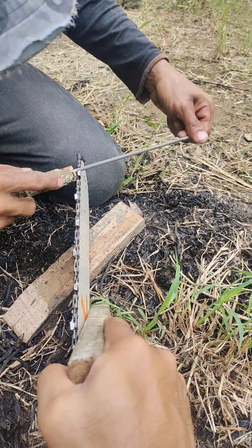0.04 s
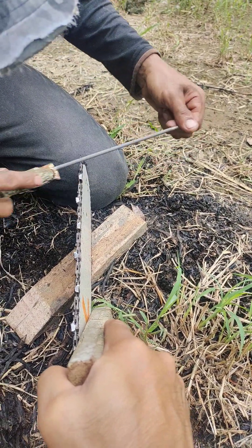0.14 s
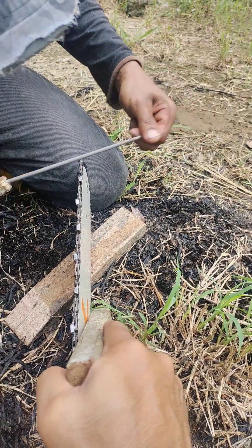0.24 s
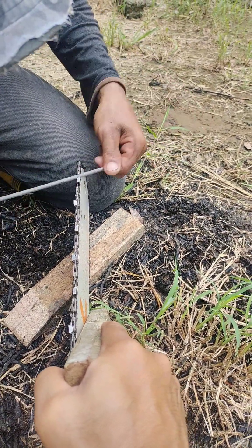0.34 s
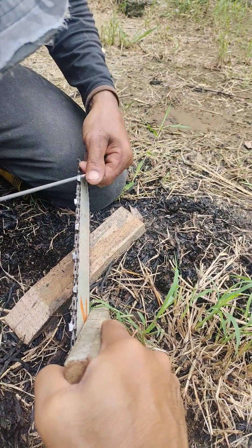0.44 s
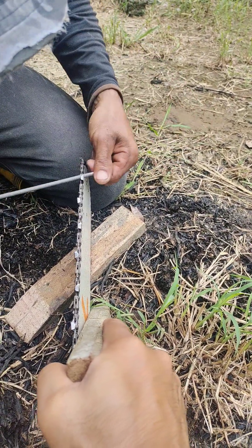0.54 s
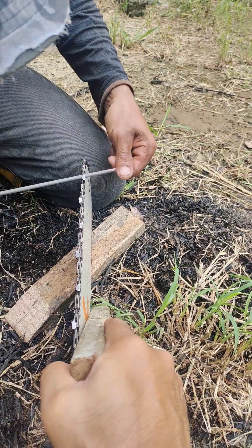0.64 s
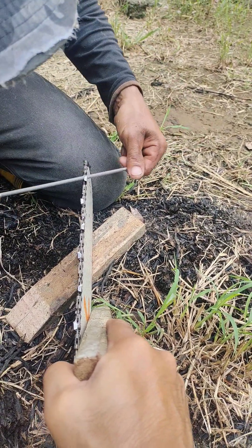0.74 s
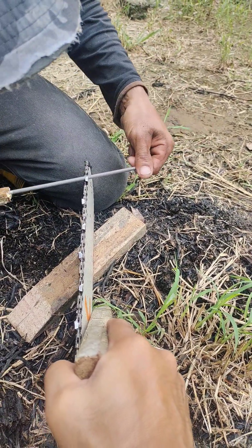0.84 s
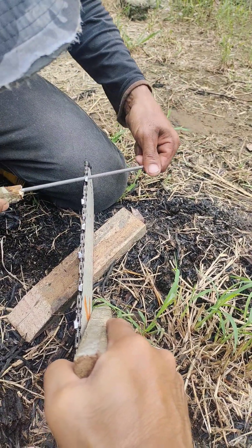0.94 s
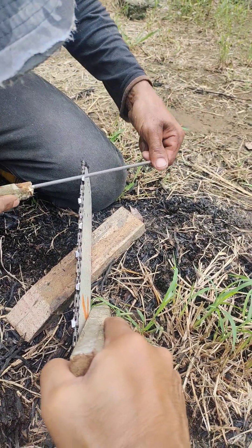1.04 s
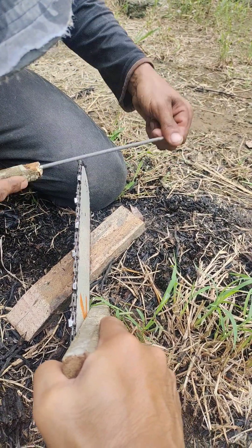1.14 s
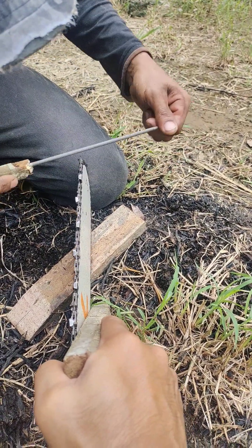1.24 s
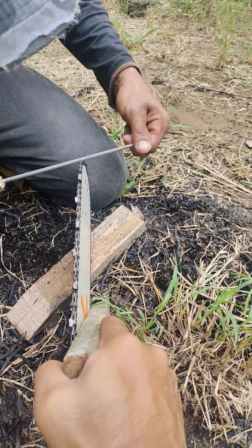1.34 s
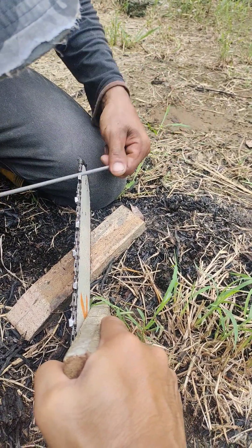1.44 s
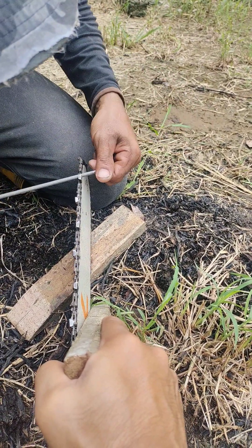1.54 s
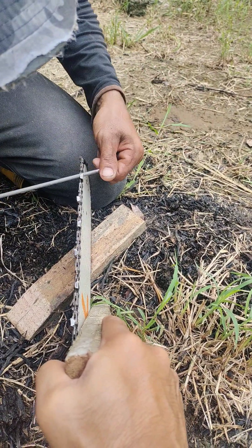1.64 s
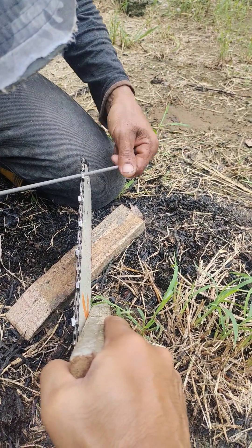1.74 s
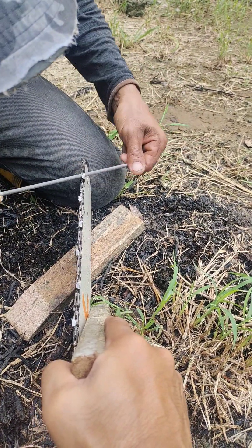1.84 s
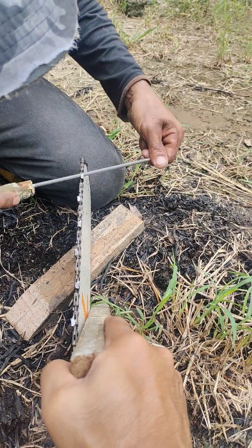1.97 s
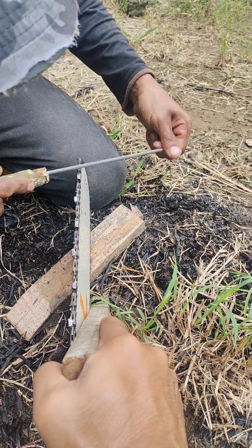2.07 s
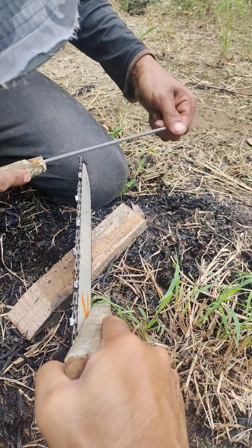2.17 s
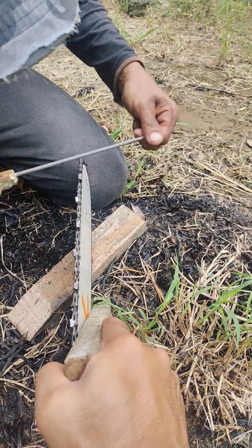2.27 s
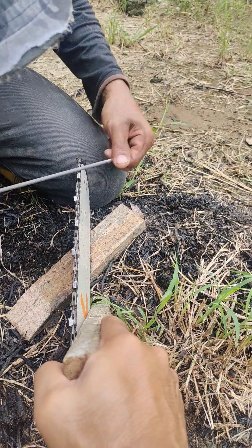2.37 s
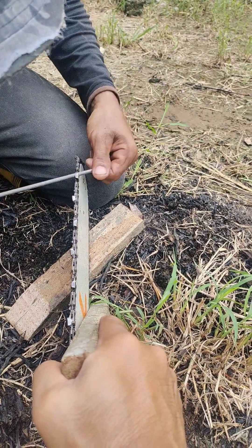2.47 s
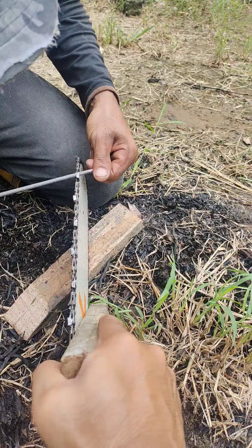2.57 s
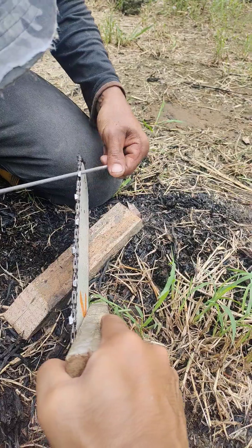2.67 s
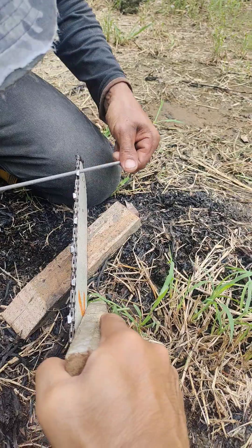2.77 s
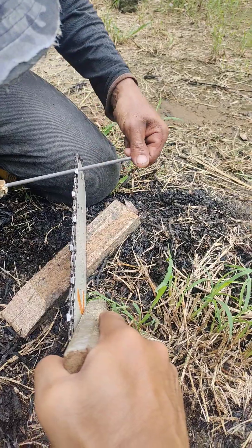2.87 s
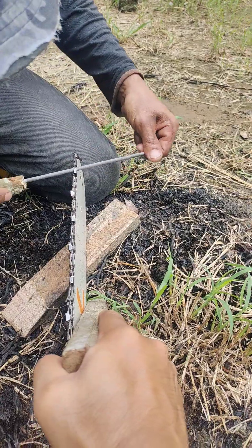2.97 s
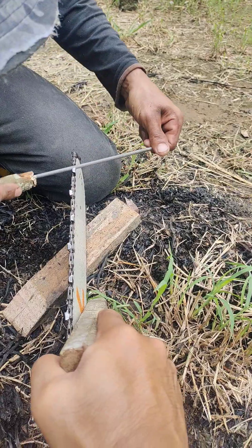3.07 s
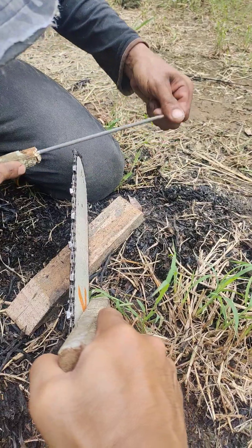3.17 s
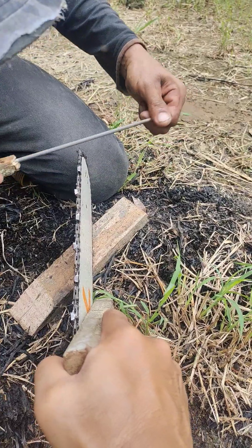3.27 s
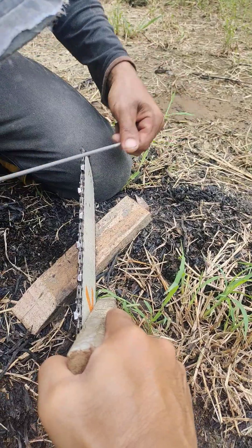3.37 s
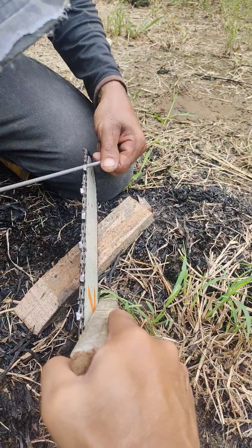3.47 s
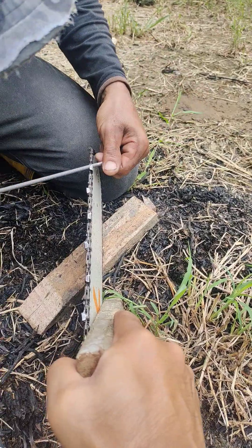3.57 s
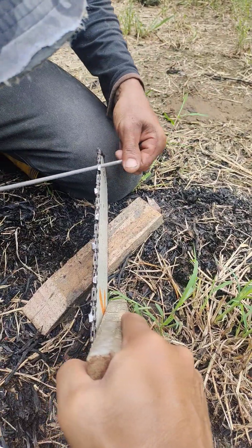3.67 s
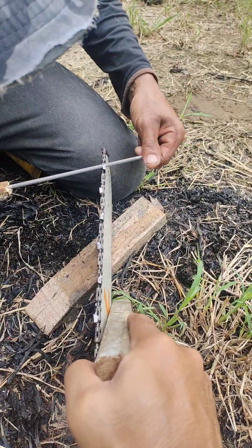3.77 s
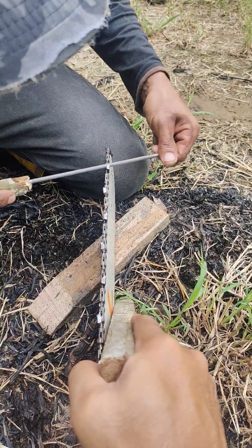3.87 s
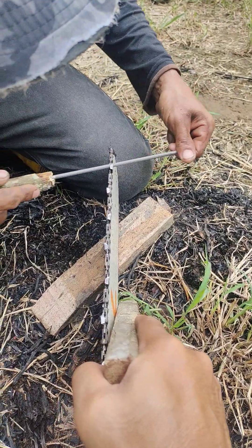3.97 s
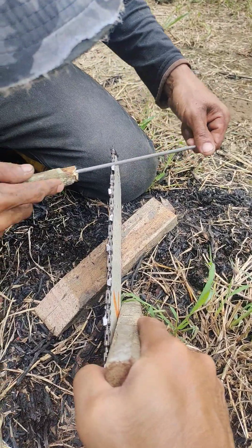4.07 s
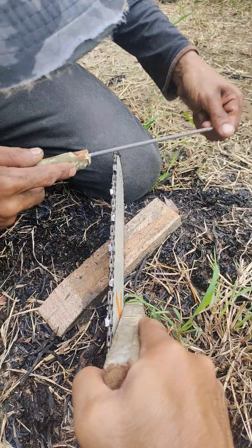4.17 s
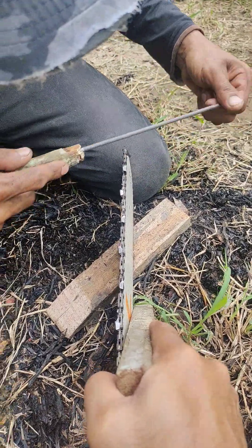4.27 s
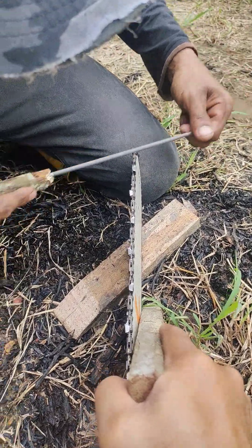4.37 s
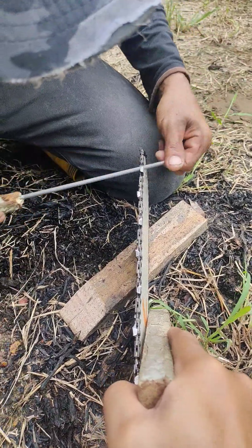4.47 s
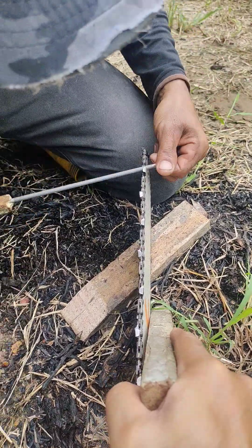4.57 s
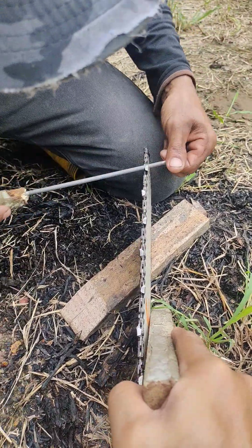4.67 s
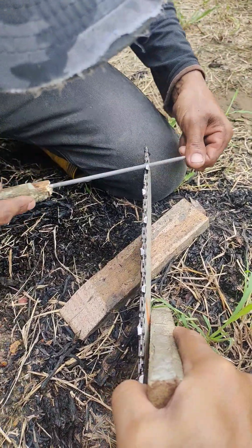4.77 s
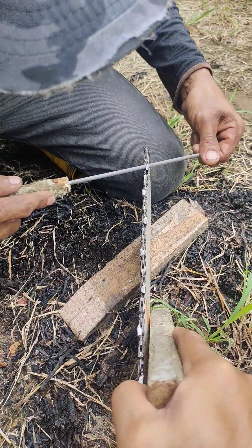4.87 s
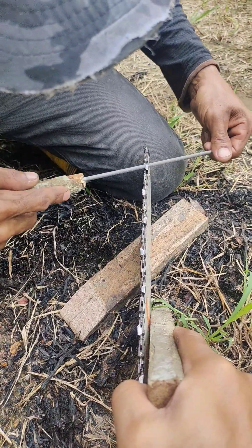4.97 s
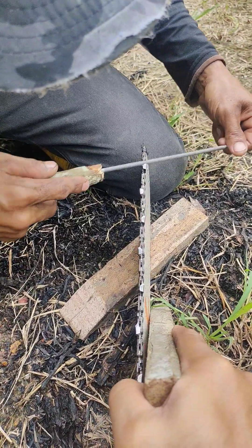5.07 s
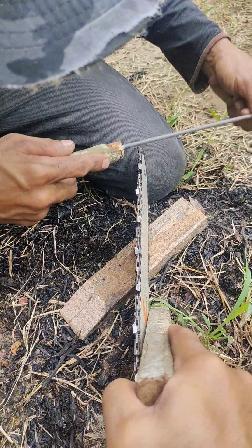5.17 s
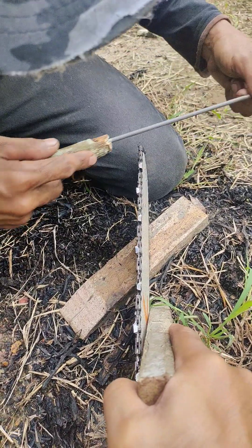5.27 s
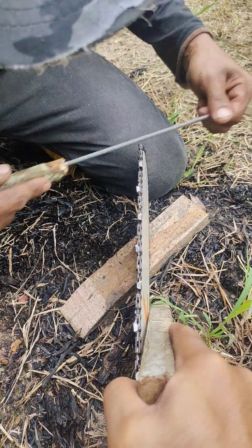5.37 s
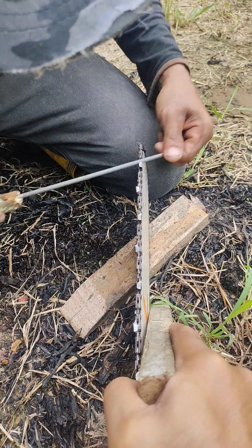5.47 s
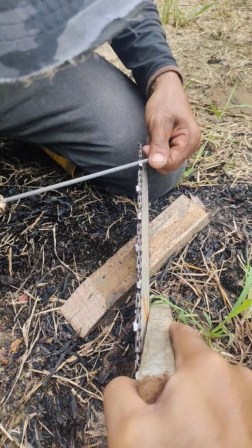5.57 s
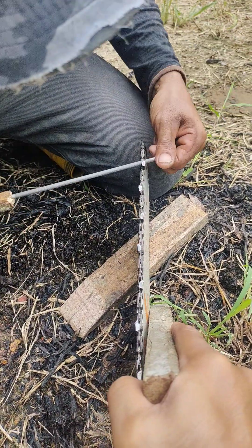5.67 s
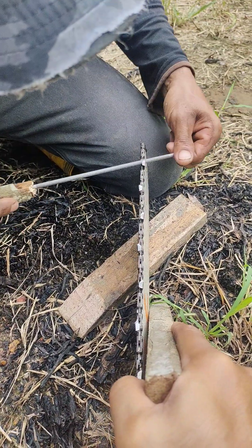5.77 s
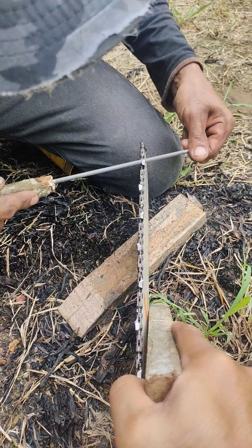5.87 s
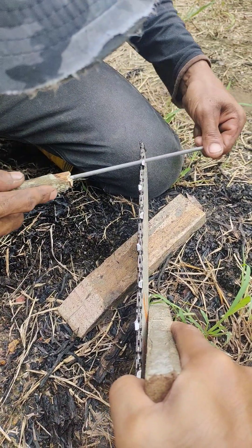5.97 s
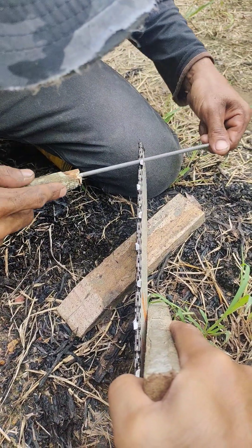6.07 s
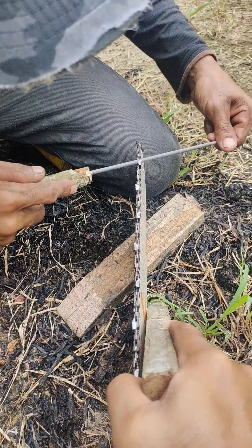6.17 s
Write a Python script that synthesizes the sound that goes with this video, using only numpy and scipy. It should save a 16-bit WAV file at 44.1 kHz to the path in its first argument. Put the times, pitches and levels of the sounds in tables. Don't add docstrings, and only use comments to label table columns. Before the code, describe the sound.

Close, bright metallic filing on a saw chain, a short drag back then a longer grating push, about one stroke a second in open air.

```python
import sys
import numpy as np
from scipy import signal
from scipy.fft import rfft, irfft, next_fast_len
from scipy.io import wavfile
from scipy.ndimage import uniform_filter1d, map_coordinates

SR = 44100
rng = np.random.default_rng(int(sys.argv[2]) if len(sys.argv) > 2 else 0)


def wav_out(sig):
    wavfile.write(sys.argv[1], SR, np.round(np.clip(np.atleast_2d(sig).T, -1, 1) * 32767).astype(np.int16))


def how_loud(loudness_db):
    steps = np.asarray(loudness_db, float) / 20
    return 10 ** steps


N = 274302
USUAL_PRESSURE_DB, USUAL_BITE_DB = -45, -56


def filing():
    t = np.arange(N) / SR
    back, forth = drags(t), pushes(t)
    gains = np.hypot(back, forth)
    dragging = back[1] > forth[1]
    chatter = how_loud(1.52 * wobble(30))
    parts = [
        (bar_flex(), 1.1),
        (link_rattle(chatter, dragging), 3),
        (cutter_scrape(chatter, dragging), 2.5),
        (fine_cutting(chatter, dragging), 3),
    ]
    steel = sum(gain * how_loud(db) * unit(part) for gain, (part, db) in zip(gains, parts))

    def cancelled(hz):
        left = gap(hz, 288, 36, depth=0.4) * gap(hz, 557, 45, depth=0.53) * gap(hz, 1106, 34, depth=0.52)
        right = gap(hz, 250, 43, depth=0.38) * gap(hz, 5050, 250, depth=0.5)
        return np.array([left, right])
    return filtered(steel, cancelled)


# (time [s], pressure [dB], bite [dB])
STROKES = [
    [(0.55, -45.5, -57.5), (0.604, -43, -48.5), (0.688, -45, -55.5), (0.72, -48, -59), (1.01, -43.5, -56.5),
     (1.062, -43.5, -65)],
    [(1.655, -42.5, -62.5), (1.703, -48, -49.5), (1.765, -40.5, -56), (1.791, -42, -54), (1.977, -41, -52),
     (2.04, -47.5, -60)],
    [(2.6, -51, -62.5), (2.626, -48, -57), (2.792, -38.5, -52.5), (2.912, -48.5, -54), (2.976, -35.5, -53),
     (3.052, -49, -62.5)],
    [(3.61, -50.5, -67.5), (3.658, -41.5, -51.5), (3.78, -49, -54), (3.88, -39, -55.5), (4.062, -46, -55),
     (4.07, -45, -55)],
    [(4.63, -54.5, -62.5), (4.692, -47.5, -54), (4.86, -41, -53.5), (4.878, -46.5, -54),
     (5.022, -45.5, -54.5), (5.072, -41.5, -58)],
    [(5.665, -40, -59.5), (5.723, -41, -52), (5.801, -47.5, -55), (5.933, -45, -55.5), (6.187, -45, -61.5),
     (6.21, -55, -58.5)],
]
# (time [s], pressure [dB], bite [dB])
EARLIER_STROKE = [(0.0, -42, -53.5), (0.03, -47.5, -61.5)]
# (time [s], force [dB])
LIFTS = [
    (0.032, -57),
    (1.078, -39.5),
    (2.057, -43),
    (3.068, -39.5),
    (4.092, -43.5),
    (5.089, -36),
    (6.24, -37),
]
# (usual level [dB], slope on pressure [dB/dB], slope on bite [dB/dB])
FOLLOW = [(-45, 1.1, 0.01), (-47.5, 0.12, 0.55), (-57, -0.23, 0.97), (-54.5, -0.05, 1.14)]
# (flex, rattle, scrape, fine [dB/s])
RISE_DB_PER_S = (603, 550, 450, 400)
FALL_DB_PER_S = (900, 1100, 1180, 1500)


def pushes(t):
    reach_s = 0.125
    lift_db, lift_rise_db_per_s = np.array([[-5], [0.7], [-2.5], [-12]]), 902
    power = np.zeros((4, N))
    rise, fall = np.array(RISE_DB_PER_S)[:, None], np.array(FALL_DB_PER_S)[:, None]
    usual_db, per_pressure, per_bite = np.transpose(FOLLOW)[:, :, None]
    for rows, (clear, _) in zip(EARLIER_STROKE_FIRST(), LIFTS):
        s, pressure_db, bite_db = np.transpose(rows)
        on = (t > s[0] - reach_s) & (t < clear + reach_s)
        u = t[on]
        db = usual_db + per_pressure * (np.interp(u, s, pressure_db) - USUAL_PRESSURE_DB)
        db = db + per_bite * (np.interp(u, s, bite_db) - USUAL_BITE_DB)
        db = db - rise * np.maximum(s[0] - u, 0) - fall * np.maximum(u - clear, 0)
        power[:, on] += how_loud(db) ** 2
    for clear, force_db in LIFTS:
        on = np.abs(t - clear) < reach_s
        u = t[on] - clear
        db = force_db + lift_db + lift_rise_db_per_s * np.minimum(u, 0) - fall * np.maximum(u, 0)
        power[:, on] += how_loud(db) ** 2
    return np.sqrt(power)


def EARLIER_STROKE_FIRST():
    return [EARLIER_STROKE] + list(STROKES)


# (landing [s], halt [s], weight [dB], top speed [dB], lean on the bar at the halt [dB])
DRAGS = [
    (0.363, 0.466, -39.5, -43, -50),
    (1.458, 1.562, -42.5, -47, -46),
    (2.416, 2.508, -43, -43.5, -45),
    (3.438, 3.525, -39, -45, -39.5),
    (4.468, 4.554, -40, -41.5, -48),
    (5.476, 5.57, -41, -40, -48),
]
# (landing [dB], top speed [dB], quiet over lean [dB], rest over lean [dB])
DRAG_FLEX_DB = (-41.5, -49, -6.5, -49)
# (landing, top speed, halt, quiet, rest [dB])
DRAG_RATTLE_DB = (-4.5, 0.5, -3, -20, -36)
DRAG_SCRAPE_DB = (-1.5, 0, -20, -37, -38)
DRAG_FINE_DB = (-9, -7, -23, -58, -40)


def drags(t):
    peak_s, stop_s = 0.035, 0.02
    gains = np.zeros((4, N))
    land_db, slide_db, quiet_db, rest_db = DRAG_FLEX_DB
    for lands, halts, weight_db, speed_db, lean_db in DRAGS:
        s = [lands, lands + peak_s, halts, halts + stop_s, halts + 2 * stop_s]
        lean_rattle_db = 0.33 * (lean_db - USUAL_PRESSURE_DB) * np.greater_equal(s, halts)
        shapes = [
            (land_db, slide_db, lean_db, lean_db + quiet_db, lean_db + rest_db),
            weight_db + np.array(DRAG_RATTLE_DB) + lean_rattle_db,
            speed_db + np.array(DRAG_SCRAPE_DB),
            speed_db + np.array(DRAG_FINE_DB),
        ]
        on = (t >= s[0]) & (t < s[-1])
        gains[:, on] = [how_loud(np.interp(t[on], s, db)) for db in shapes]
    return gains


# (frequency [Hz], width [Hz], level [dB], right ear [dB])
FLEX = [(347.3, 33.4, 3.5, -7), (393.7, 34.2, -0.5, -2.5), (428, 62, -16.5, 2)]


def bar_flex():
    return steadied(radiated(teeth(4000, 0.5, 0.93), FLEX, lag_s=0.00031), firm=0.25)


# (frequency [Hz], width [Hz], level [dB], right ear [dB])
RATTLE = [(725.5, 129, 1, -7.5), (864, 133, 1, -21), (1015, 67, -1.5, -10), (1245, 290, -10.5, -9.5),
          (1454, 170, -9.5, -3.5)]
# (frequency [Hz], width [Hz], level [dB], right ear [dB])
SING = [(1629.5, 51, 1.5, -10.5), (2637, 40, -9.5, -9)]


def link_rattle(chatter, dragging):
    force = sliding(chatter * teeth(6000, 2.4, 0.56), patchy_db=1.05, turns=0.74)
    rattle = radiated(force, RATTLE, lag_s=0.0004)
    rattle = filtered(rattle, lambda hz: (1j * hz / (520 + 1j * hz)) ** 4)
    light = filtered(rattle, lambda hz: gap(hz, 810, 200, depth=0.21))
    rattle = np.where(dragging, unit(light), unit(rattle))
    song = radiated(chatter * teeth(6000, 1.6, 0.44), SING, lag_s=0.00041)
    return unit(rattle) + how_loud(-4) * steadied(song, firm=0.2)


# (frequency [Hz], width [Hz], level [dB], right ear [dB])
SCRAPE = [(2150, 380, 0, -1), (2545, 390, 2, -4), (2696, 210, 1, 1.5), (3460, 870, -10.5, 7),
          (3935, 200, 2.5, -8.5), (4280, 450, -3.5, 0.5), (4760, 680, -6.5, -2)]
# (frequency [Hz], width [Hz], level [dB], right ear [dB])
TWIST = [(3100, 390, -2.3, 0), (3460, 380, 0.3, 0)]


def cutter_scrape(chatter, dragging):
    force = sliding(chatter * teeth(9000, 1.8, 0.43), patchy_db=1.5, turns=1.0)
    scrape = radiated(force, SCRAPE, lag_s=0.000377)
    scrape = filtered(scrape, lambda hz: gap(hz, 3274, 290, depth=0.85))
    force = sliding(chatter * teeth(9000, 1.4, 1.0), patchy_db=1.5, turns=0.45)
    twist = radiated(force, TWIST, lag_s=1.5 / 3330)
    scrape = unit(scrape) + how_loud(-5) * unit(twist)
    loose = filtered(scrape, lambda hz: 1 + 0.33 * np.exp(-((hz - 4150) / 600) ** 2))
    return np.where(dragging, unit(loose), unit(scrape))


# (frequency [Hz], width [Hz], level [dB], right ear [dB])
FINE = [(5170, 1040, 0.5, -6.5), (6560, 740, 1, 0), (7880, 880, 0, 3), (8690, 880, -5, 8.5),
        (9650, 330, -1.5, 2), (10540, 410, 0, 5.5), (12170, 870, -2, 3.5), (13600, 380, 4, -5),
        (16200, 1500, 2, -5)]


def fine_cutting(chatter, dragging):
    force = sliding(chatter * teeth(14000, 2.0, 1.2), patchy_db=1.5, turns=1.0)
    fine = radiated(force, FINE, lag_s=-0.000703)
    fine = filtered(fine, lambda hz: gap(hz, 3300, 500, depth=0.85))
    blunt = filtered(fine, lambda hz: 1 / (1 + 1j * hz / 9000) ** 2)
    return np.where(dragging, unit(blunt), unit(fine))


def teeth(per_s, spread_db, clump_db):
    hits = (rng.random(N) < per_s / SR) * how_loud(spread_db * rng.standard_exponential(N))
    return hits * how_loud(clump_db * wobble(90)) * rng.standard_normal(N)


def sliding(force, patchy_db, turns):
    z = signal.stft(force, nperseg=512)[2]
    drift = rng.standard_normal((2, 2) + z.shape)
    drift = uniform_filter1d(drift, size=3, axis=2)
    drift = unit(uniform_filter1d(drift, size=16, axis=3))
    moved = z * how_loud(patchy_db * drift[0]) * np.exp(1j * turns * drift[1])
    return signal.istft(moved, nperseg=512)[1][:, :N]


def radiated(force, modes, lag_s):
    def response(f):
        left, right = 0, 0
        for k, (c, w, db, right_db) in enumerate(modes):
            peak = (-1) ** k * how_loud(db) * 1j * f * w / (c * c - f * f + 1j * f * w)
            left = left + peak
            right = right + peak * how_loud(right_db)
        return np.array([left, right * np.exp(-2j * np.pi * f * lag_s)])
    return filtered(force, response)


def steadied(x, firm):
    envelope = np.abs(signal.hilbert(unit(x[0]), next_fast_len(N))[:N])
    swing = uniform_filter1d(envelope, size=220)
    return unit(x / (swing + 0.39) ** firm)


def gap(hz, c_hz, width_hz, depth):
    return 1 - depth * np.exp(-((hz - c_hz) / width_hz) ** 2)


# (time [s], peak [dB], thud [dB], ring [dB], left minus right [dB])
LANDINGS = [(0.3425, -22.5, -4.5, -16, -2), (0.363, -28.5, -4, -6, -1), (0.3928, -34, -11, -10, -3),
            (1.4563, -35.5, -5, -5, -3), (1.488, -39.5, 10.5, -12, 2), (2.3912, -34.5, -2.5, -12, -1),
            (2.4151, -31, -18, -7.5, -9), (3.4165, -30, -2.5, -16, -2), (3.4385, -36, -19, -9, -3),
            (4.4551, -38.5, 8, -17, -2), (4.4666, -39, -10, -5.5, -3), (5.4761, -25, -3, -7, -7)]
# (time [s], peak [dB], thud [dB])
SNAPS = [
    (1.071, -32.5, -17),
    (2.0552, -47, -13),
    (3.0605, -36.5, -8),
    (4.0838, -34, 2.5),
    (5.0838, -30, -4),
]
# (time [s], peak [dB], thud [dB])
CATCHES = [(0.5072, -50, 2), (0.5444, -43, 1), (0.6804, -27, 0.5), (0.7696, -33, 3), (0.8869, -45, -4),
           (1.6202, -45, -5), (1.6432, -47, -2), (1.6736, -40, 6), (1.6965, -33, -2), (2.5716, -39, 1),
           (2.5985, -36, 6.5), (3.6032, -40.5, 5), (3.6486, -25.5, -2), (3.7214, -29, -12),
           (3.7764, -38.5, 9), (3.8342, -30, 7), (3.8744, -36, 9.5), (4.6214, -48, 8), (4.6483, -39, -6),
           (4.7284, -34, 5), (4.8414, -36, 10), (5.6356, -36, -15), (5.6635, -35, 6.5), (5.683, -30.5, -8),
           (1.765, -39, 6), (1.845, -41, 7), (1.93, -35, 11)]
# (frequency [Hz], level [dB], 60 dB decay time [s])
RING = [(2430, -8, 0.037), (3990, -9, 0.042), (4270, -3, 0.077), (4700, -21, 0.02), (6170, -7, 0.065),
        (8200, -11, 0.046), (9880, 4, 0.024), (11900, -38, 0.035), (14660, -26, .05)]


def ticks():
    bright, shake = np.zeros((2, N + SR)), np.zeros((2, N + SR))
    t = np.arange(SR // 8) / SR
    knocks = [(*row, 0.023) for row in LANDINGS]
    knocks += [(*row, -8, 0, 0.015) for row in SNAPS]
    knocks += [(*row, -25, -1.2, 0.0061) for row in CATCHES]
    for s, db, thud_db, ring_db, pan_db, t60_s in knocks:
        start = round(s * SR)
        at = slice(start, start + len(t))
        ring = 0
        for hz, level, ring_t60_s in RING:
            scatter, phase = rng.standard_normal((2, 2, 1))
            decay_db = -60 * t / (ring_t60_s * (t60_s / 0.028) ** 2)
            ring = ring + how_loud(level + 3 * scatter + decay_db) * np.sin(2 * np.pi * hz * t + 2 * phase)
        crack = rng.standard_normal((4, len(t))) * how_loud(-60 * t / t60_s)
        sharp_db = -8 * np.log10(t60_s / 0.027)
        knock = how_loud(ring_db + 3) * ring * (1 - np.exp(-t / 0.00037)) + how_loud(sharp_db - 5) * crack[:2]
        bright[:, at] += how_loud([[db + pan_db / 2], [db - pan_db / 2]]) * knock
        shake[:, at] += how_loud([[db + thud_db + sharp_db + 16], [db + sharp_db - 5]]) * crack[2:]
    edge = filtered(bright[:, :N], lambda hz: 1j * hz / (1500 + 1j * hz) / (1 + 1j * hz / 12000))
    bar = radiated(shake[0, :N], RATTLE + SING + FLEX, lag_s=0.00051)
    cutter = radiated(shake[1, :N], SCRAPE, lag_s=0.00029)
    return edge + bar + cutter


# (time [s], low kind [dB], high kind [dB])
INSECTS = [(0.1, -70, -79), (1.2, -70.5, -82), (2.2, -73, -85), (3.2, -90, -81), (4.2, -67, -83),
           (4.45, -77, -80), (5.2, -95, -81), (6.2, -103, -84)]
# (frequency [Hz], level per Hz [dB])
RUMBLE = [(15, -74), (25, -38), (62, -6), (123, -5), (146, -2.5), (220, -9.5), (268, -13), (325, -13.5),
          (409, -12.5), (450, -18), (580, -76), (990, -120)]
# (time [s], level [dB])
RUMBLE_DB = [(0.0, -54.5), (0.52, -55.5), (0.81, -53), (1.28, -56.5), (3.52, -55.5), (3.97, -52),
             (4.21, -57), (4.5, -58), (4.99, -52), (5.33, -57), (5.56, -56.5), (5.89, -49.5), (6.22, -53.5)]
# (frequency [Hz], width [Hz], level [dB])
DRONES = [(159, 11, -67), (201, 9.2, -66)]
# (frequency [Hz], level per Hz [dB])
AIR = [(260, -55), (450, -6), (714, -4.5), (991, -10), (1220, -9.5), (3780, -18.5), (7280, -19),
       (9240, -23.5), (15800, -26)]


def field():
    t = np.arange(N) / SR
    s, *cols = np.transpose(INSECTS)
    low_db, high_db = [np.interp(t, s, db) for db in cols]
    insects = how_loud(low_db - 4.5) * narrow(5140, 400) + how_loud(high_db + 6) * narrow(7540, 700)
    traffic_db = np.interp(t, *np.transpose(RUMBLE_DB)) + 1 + 0.81 * wobble(3.27)
    rumble = how_loud(traffic_db) * spread(RUMBLE)
    drone = sum(how_loud(db + 2.5 * wobble(1.34)) * narrow(c, w)[0] for c, w, db in DRONES)
    air = how_loud(-60.5 + 0.79 * wobble(4.23)) * spread(AIR)
    return rumble + drone + air + insects


def narrow(c_hz, width_hz):
    noise = rng.standard_normal((2, N))
    return unit(filtered(noise, lambda f: np.exp(-((f - c_hz) / width_hz) ** 2)))


# (frequency [Hz], correlation [-1..1])
ALIKE = [(60, 0.98), (180, 0.98), (550, 0.27), (1650, -0.14), (4970, 0.025), (15000, -0.11)]
# (frequency [Hz], left minus right [dB])
LEAN = [(60, -1), (180, 3), (550, 0.5), (1650, 3), (4970, 0), (15000, 0)]


def spread(spectrum):
    def mid_side(hz):
        angle = np.arccos(np.clip(along(ALIKE, hz), -1, 1)) / 2
        return how_loud(along(spectrum, hz)) * [np.ones_like(hz), np.tan(angle)]
    mid, side = filtered(rng.standard_normal((2, N)), mid_side)
    ears = np.array([mid + side, mid - side])
    return unit(filtered(ears, lambda hz: how_loud(along(LEAN, hz) / 2 * np.array([[1], [-1]]))))


def unit(x):
    return x / np.sqrt(np.mean(x ** 2) + 1e-20)


def along(points, hz):
    f, v = np.transpose(points)
    return np.interp(np.log(hz + 1), np.log(f + 1), v)


def wobble(rate):
    return map_coordinates(rng.standard_normal(int(N * rate / SR) + 4), [np.arange(N) * rate / SR])


def filtered(x, response):
    m = next_fast_len(N + SR // 4)
    return irfft(rfft(x, m) * response(np.fft.rfftfreq(m, 1 / SR)), m)[..., :N]


def scene():
    return filing() + ticks() + field()


def joint(x):
    hz, _, z = signal.stft(np.array([x[0] + x[1], x[0] - x[1]]) / 2, SR, nperseg=1024)
    power = uniform_filter1d(np.abs(z) ** 2, size=5, axis=1)
    power = uniform_filter1d(power, size=7, axis=2)
    keep = (power * how_loud(6) ** 2 > power[::-1]) | (hz[:, None] < 2600)
    mid, side = signal.istft(z * keep, SR, nperseg=1024)[1][:, :N]
    return np.array([mid + side, mid - side])


def low_pass(x):
    return signal.sosfilt(signal.butter(12, 16490, fs=SR, output="sos"), x)


def record(dry):
    def phone(hz):
        low_cut = 1 / np.sqrt(1 + (60 / (hz + 1)) ** 16) + how_loud(-7) * (hz < 42)
        top_cut = np.where(hz < 15600, 1, how_loud(-40) * (hz < 16300))
        return low_cut * top_cut
    mix = joint(filtered(dry, phone))
    return low_pass(mix)


dry = scene()
out = record(dry)
wav_out(out)
```